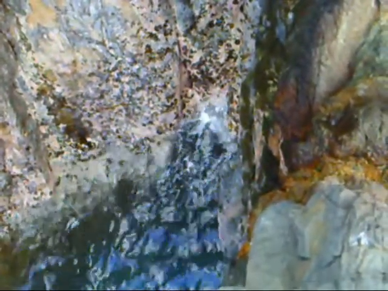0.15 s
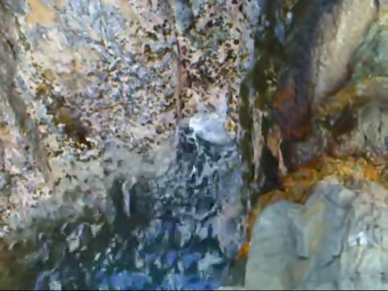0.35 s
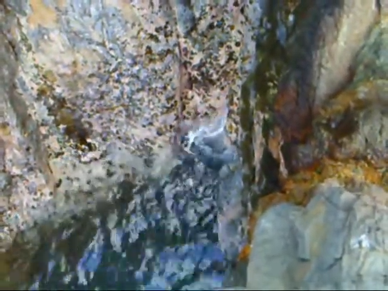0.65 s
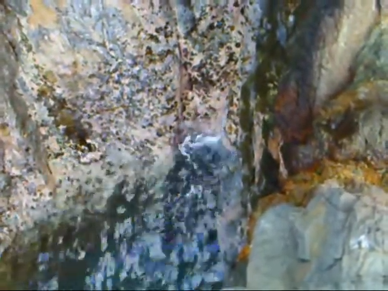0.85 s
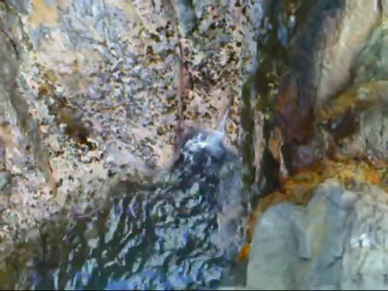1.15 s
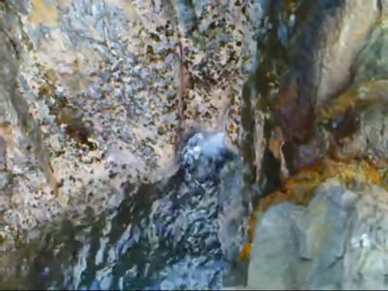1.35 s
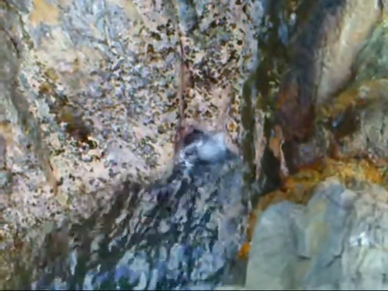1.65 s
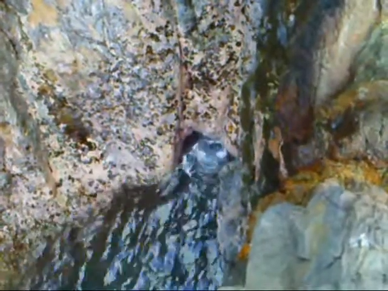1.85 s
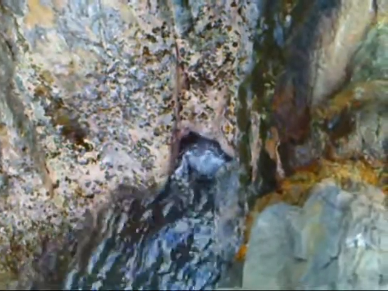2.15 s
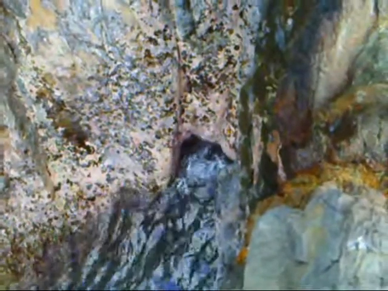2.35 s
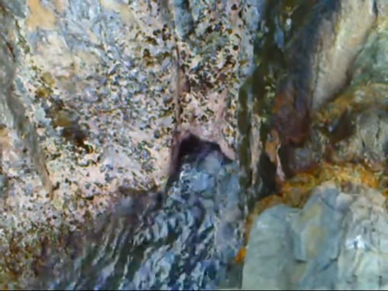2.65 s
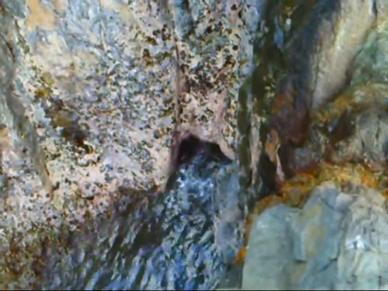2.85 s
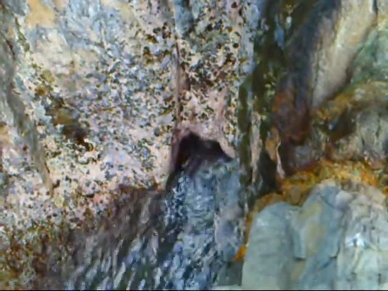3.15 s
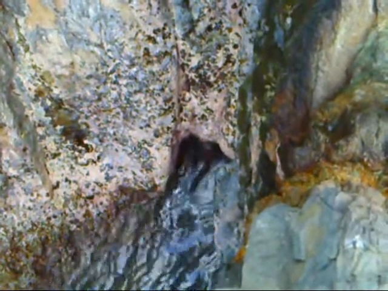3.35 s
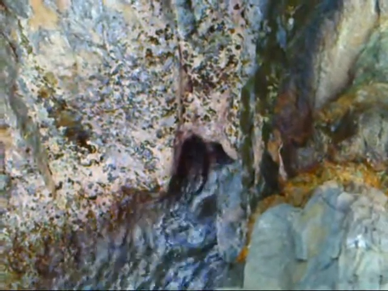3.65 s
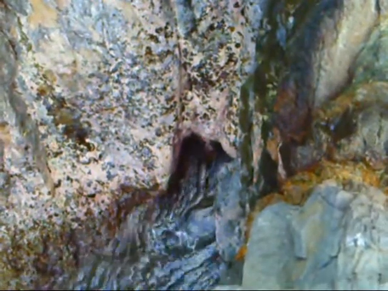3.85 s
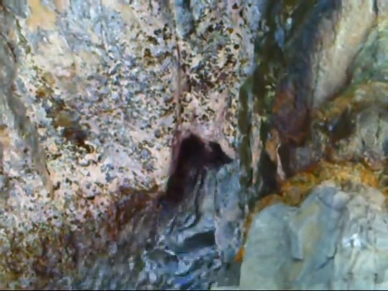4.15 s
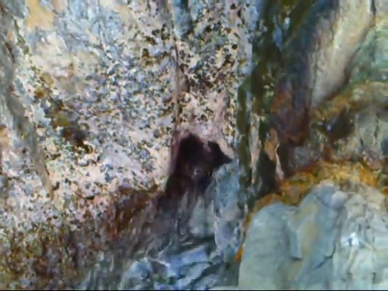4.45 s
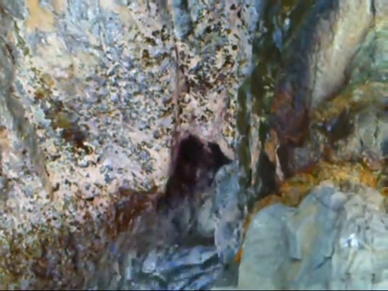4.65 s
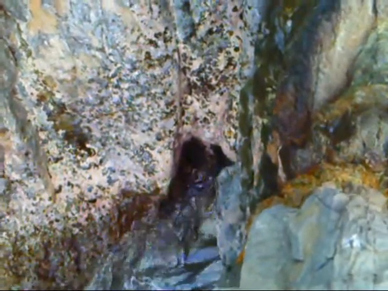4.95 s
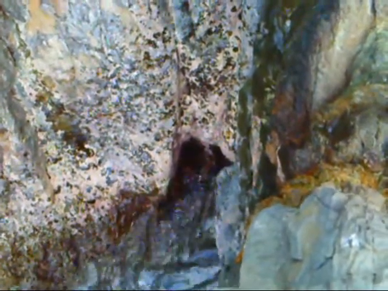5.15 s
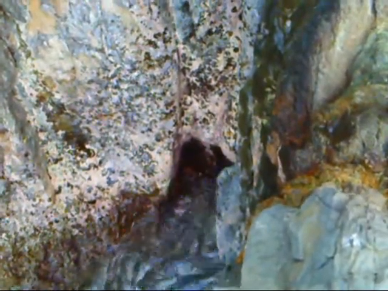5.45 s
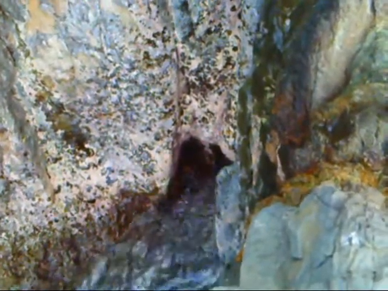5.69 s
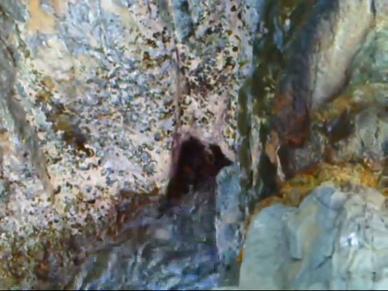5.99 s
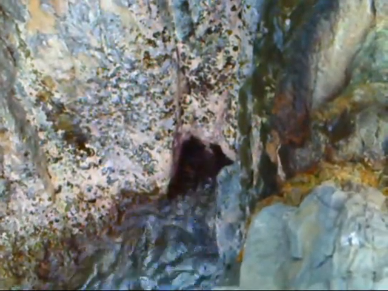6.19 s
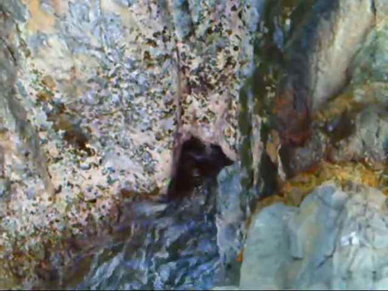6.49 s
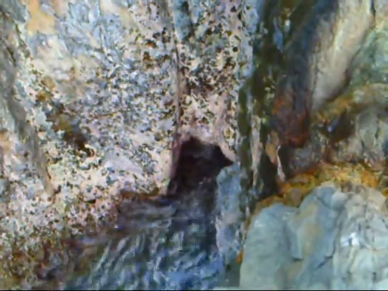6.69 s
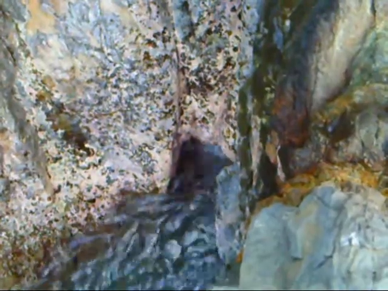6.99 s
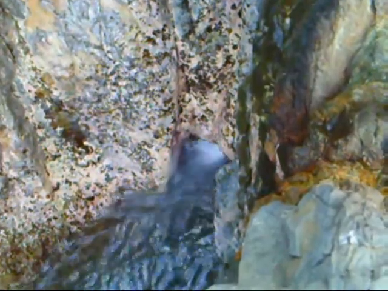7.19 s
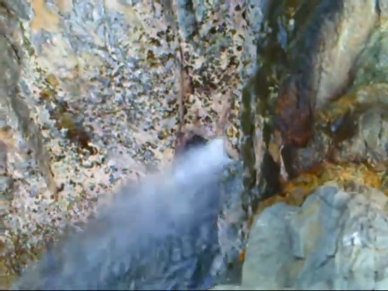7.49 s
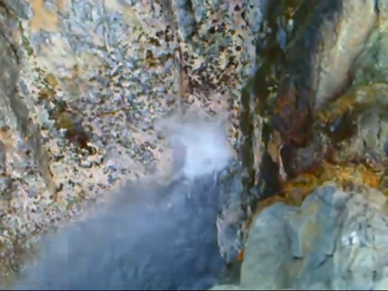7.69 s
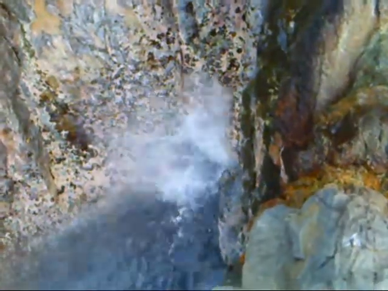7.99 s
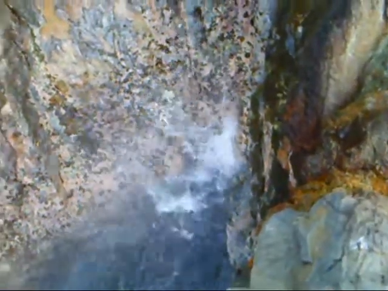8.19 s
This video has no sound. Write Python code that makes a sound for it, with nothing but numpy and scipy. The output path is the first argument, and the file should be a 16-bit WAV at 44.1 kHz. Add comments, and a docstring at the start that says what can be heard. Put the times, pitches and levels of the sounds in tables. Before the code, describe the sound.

Sea surge rushes and churns in a narrow rock inlet, waves thumping into a hollow cave before a heavier boom and a burst of hissing spray.

```python
"""Mono, one microphone on a small camera; sea surge churns in a narrow rock inlet below it, up to about 4 kHz.
From the start: noise and bubbles make the water, low noise bands the booming cave and wind on the microphone.
The waveform jumps at the joints of blocks about 1 s long. Waves slam from 1.2 s, trapped air gulps from 2.1 s
as damped, rising sines, and at 5.0 s a short stretch is nearly silent.
The heaviest slam into the cave comes at 6.8 s, and blown-out spray hangs and rains down from about 7.4 s."""
import sys
import numpy as np
from scipy import signal
from scipy.fft import rfft, irfft, next_fast_len
from scipy.io import wavfile
from scipy.ndimage import uniform_filter1d, map_coordinates

SR = 44100
rng = np.random.default_rng(int(sys.argv[2]) if len(sys.argv) > 2 else 0)


def output_pcm(signal):
    """Save a mono or channel-first signal as 16-bit PCM at the path in sys.argv[1].

    Samples are clipped to [-1, 1] before scaling.
    """
    pcm = np.clip(np.atleast_2d(signal).T, -1, 1) * 32767
    wavfile.write(sys.argv[1], SR, np.round(pcm).astype(np.int16))


def invert_db(x):
    """Field ratio 10**(x/20) for x, a level in decibels (scalar or array-like)."""
    u = np.asarray(x, float) / 20
    return 10 ** u


N = 367353

# Spectra of the low slosh, the wash and the bright spray: f/Hz, relative level/dB per Hz
SLOSH_SPECTRUM = [(130, -41.5), (200, -8), (300, -3), (430, -2.5), (560, -8.5), (800, -46)]
WASH_SPECTRUM = [(330, -41.5), (480, -6), (650, -4), (1050, -3), (1200, -4.5), (1700, -17), (2200, -37.5),
                 (3700, -120)]
SPRAY_SPECTRUM = [(1000, -23.5), (1500, -3), (1900, -2.5), (2500, -3.5), (3300, -4), (3700, -10),
                  (4000, -19), (4300, -46), (4700, -87)]
# Spectra of the cave's hollow and of wind on the microphone: f/Hz, relative level/dB per Hz
CAVE_SPECTRUM = [(50, -34.5), (85, -5.5), (130, 0), (200, 0.5), (280, -7.5), (400, -45)]
WIND_SPECTRUM = [(8, -11.5), (20, -6), (60, 2.5), (90, 0), (150, -36)]
# How hard the water runs in the inlet: t/s, wash level/dB
FLOW = [(0, -21), (.6, -23), (1.1, -23), (1.55, -20.5), (1.85, -20.5), (2.2, -19.5), (2.6, -19.5),
        (3.3, -19.5), (4.2, -20.5), (4.7, -22), (5.4, -22), (5.92, -22), (6.3, -20.5), (7.0, -19),
        (7.6, -19), (8.2, -20), (8.33, -23)]
# Waves slamming into the cave: t/s, hold/s, gush of wash/dB, hollow thump/dB, boom/dB
SLAMS = [(1.2, 0.22, 1, 2.5, 1), (2.1, 0.09, 0.4, 0.5, 1), (3.282, .1, 0.3, 2, 0.5),
         (6.023, 0.16, 0.5, 3, 3.5), (6.426, 0.18, 1.5, 0.5, 5.5), (6.791, .04, 4.5, 5.5, 11.5),
         (7.073, 0.1, 3, 3, 4.5), (7.33, 0.14, 1, 4.5, 7.5), (7.77, 0.024, 1, 1.5, 1),
         (8.025, 0.063, 1.5, 3.5, -1)]
# Spray that hangs and rains down: t/s, hold/s, added level/dB
BLOWOUT = (7.45, 0.51, 2.3)
# Cave rumble between slams: t/s, level/dB
RUMBLE = [(0, -29), (.66, -32), (1.5, -29.5), (2.2, -30.5), (3.3, -29), (3.9, -29.5), (4.6, -35),
          (5.6, -33.5), (5.9, -31), (6.3, -35), (7.6, -32), (8.33, -31)]
# Steady wind on the microphone: t/s, level/dB
BREEZE = [(0, -37), (.5, -37), (.7, -39.5), (1.35, -42.5), (3, -45), (5.7, -48.5), (6.3, -43.5), (7.3, -45),
          (8.33, -40)]
# Wind gusts: t/s, hold/s, level over the breeze/dB
GUSTS = [(.8, .24, 10), (1.75, .4, 8.5), (2.74, .12, 8), (3.302, .03, 9), (4.497, 0.5, 4),
         (6.488, .06, 11.5), (6.8, .1, 9), (7.07, .02, 8)]
# Big air pockets gulping: t/s, starting f/Hz, peak level/dB, life/cycles
GULPS = [(2.073, 91.3, -22, 7.2), (3.29, 345, -23, 12), (4.78, 245, -20, 7.5), (4.845, 496, -15, 14),
         (5.2, 612, -18.5, 20), (5.861, 109, -25, 8), (6.029, 433, -20.5, 25), (6.331, 118, -23, 11),
         (6.76, 154.4, -15, 5.1), (6.832, 140.6, -21, 9.6), (7.41, 213, -19.5, 11)]
# Block joints: t/s, jump of the waveform/full scale
JOINTS = [(.00553, .23), (1.0036, 0.076), (2.0011, .178), (2.9997, .355), (3.9979, -.206), (4.995, 0.089),
          (5.0285, -.143), (6.0262, .188), (7.0238, .0094), (8.022, .442)]
# Nearly silent stretch: start t/s, end t/s
NEAR_SILENCE = (4.995, 5.02832)

MEAN_FLOW_DB = -21
SLAM_RISE_S, SLAM_FALL_S = 0.058, 0.11
GUST_RISE_S, GUST_FALL_S = 0.092, 0.15


def unit(x):
    """x at rms 1."""
    return x / np.sqrt(np.mean(x ** 2) + 1e-20)


def curves(rows):
    """One value per sample for each column after the time."""
    s, *columns = np.transpose(rows)
    t = np.arange(N) / SR
    return [np.interp(t, s, column) for column in columns]


def wobble(rate):
    """A smooth random curve, rate knots a second."""
    knots = rng.standard_normal(N // 200)
    return map_coordinates(knots, [np.arange(N) * rate / SR])


def swell(s, hold, rise, fall):
    """0 to 1 and back, in seconds: rise up to s, hold from s, fall."""
    t = np.arange(N) / SR
    return np.interp(t, [s - rise, s, s + hold, s + hold + fall], [0, 1, 1, 0])


def coloured(x, spectrum):
    """x filtered through (Hz, dB) points on a log frequency axis, at rms 1."""
    size = next_fast_len(N + 8192)
    f, db = np.transpose(spectrum)
    log_f = np.log(np.fft.rfftfreq(size, 1 / SR) + 1)
    gain = invert_db(np.interp(log_f, np.log(f + 1), db, left=-120, right=-120))
    return unit(irfft(rfft(x, size) * gain, size)[:N])


def rush(patchy_db):
    """White noise with patches of random gain in time and frequency, patchy_db rms."""
    z = signal.stft(rng.standard_normal(N), nperseg=512)[2]
    field = uniform_filter1d(rng.standard_normal(z.shape), size=4, axis=0)
    field = uniform_filter1d(field, size=10, axis=1)
    patchy = z * invert_db(patchy_db * unit(field))
    return unit(signal.istft(patchy, nperseg=512)[1][:N])


def bubbles(s, hz, gain, cycles, size, rise=0.21):
    """Damped sines with a soft start whose pitch rises as the bubble nears the surface."""
    t = np.arange(size) / SR
    age = t * (hz / cycles)[:, None]  # in lives
    phase = 2 * np.pi * hz[:, None] * t * (1 + rise * age / 2)
    envelope = np.e * 3 * age * np.exp(-3 * age)  # peaks at 1
    wave = gain[:, None] * envelope * np.sin(phase)
    at = (s * SR).astype(int)[:, None] + np.arange(size)
    return np.bincount(at.ravel(), wave.ravel(), N + size)[:N]


def froth(hz, cycles, count, size):
    """A dense swarm of bubbles of log-normal pitch and uneven level, at rms 1."""
    s = rng.random(count) * N / SR
    pitch = hz * np.exp(0.422 * rng.standard_normal(count))
    gain = invert_db(2.8 * rng.standard_normal(count))
    return unit(bubbles(s, pitch, gain, np.full(count, cycles), size))


def surge():
    """Flow about its mean, and the gush, thump and boom of the slamming waves, in dB."""
    flow_db, = curves(FLOW)
    shapes = np.array([swell(s, hold, SLAM_RISE_S, SLAM_FALL_S) for s, hold, *_ in SLAMS])
    gush_db, thump_db, boom_db = np.transpose(SLAMS)[2:] @ shapes
    return flow_db - MEAN_FLOW_DB, gush_db, thump_db, boom_db


def slosh(heave):
    """Low water: rushing noise and big bubbles, stronger with the flow and with each hollow thump."""
    flow_db, _, thump_db, _ = surge()
    level_db = MEAN_FLOW_DB - 4.5 + 1.1 * flow_db + thump_db
    source = rush(patchy_db=-0.5) + 0.091 * froth(350, 6.9, count=2500, size=1200)
    return invert_db(level_db + 0.45 * heave) * coloured(source, SLOSH_SPECTRUM)


def wash(heave):
    """Midrange water: rushing noise and bursting bubbles that follow the flow and gush with each slam."""
    flow_db, gush_db, _, _ = surge()
    level_db = MEAN_FLOW_DB + flow_db + gush_db
    source = rush(patchy_db=.5) + 0.094 * froth(850, 4.93, count=6000, size=600)
    return invert_db(level_db + heave) * coloured(source, WASH_SPECTRUM)


def spray(heave):
    """Bright water: noise and tiny bubbles that gush with the slams; the blowout falls away slowly."""
    flow_db, gush_db, _, _ = surge()
    s, hold, db = BLOWOUT
    blowout_db = db * swell(s, hold, rise=0.061, fall=0.7)
    level_db = MEAN_FLOW_DB - 11 + .9 * flow_db + 1.12 * gush_db + blowout_db
    source = rush(patchy_db=-0.73) + 0.18 * froth(2600, 3.6, count=25000, size=160)
    return invert_db(level_db + 0.2 * heave) * coloured(source, SPRAY_SPECTRUM)


def water():
    """Slosh, wash and spray share the quick heave of the surge, each to its own degree."""
    heave = .55 * wobble(6.4) + 0.14 * wobble(40)  # dB
    return slosh(heave) + wash(heave) + spray(heave)


def gusts():
    """Rise of the wind over the breeze, in dB."""
    return sum(db * swell(s, hold, GUST_RISE_S, GUST_FALL_S) for s, hold, db in GUSTS)


def cave_boom():
    """The hollow rumbles under the swell as a low noise band, booms with slams and lifts a little in gusts."""
    *_, slam_db = surge()
    level_db = curves(RUMBLE)[0] + slam_db + .2 * gusts()
    return invert_db(level_db + 0.5 * wobble(6.5)) * coloured(rush(patchy_db=.5), CAVE_SPECTRUM)


def wind():
    """Breeze and gusts thud on the microphone as very low noise of uneven level."""
    level_db = curves(BREEZE)[0] + gusts()
    return invert_db(level_db + 1.1 * wobble(2.8)) * coloured(rng.standard_normal(N), WIND_SPECTRUM)


def air_gulps():
    """Air pockets gulp at the cave mouth: damped sines of slightly rising pitch."""
    s, hz, db, cycles = np.transpose(GULPS)
    return bubbles(s, hz, invert_db(db), cycles, size=12000, rise=.03)


def scene():
    """Water, cave, wind and air gulps at one microphone."""
    return (water() + cave_boom() + wind() + air_gulps())[None]


def low_pass(x):
    """Removes everything above the highest recorded frequency."""
    return signal.sosfilt(signal.butter(12, 12920, fs=SR, output="sos"), x)


def record(dry):
    """A small offset, a jump at each block joint that settles within milliseconds, one nearly silent stretch."""
    t = np.arange(N) / SR
    # each jump decays on both sides of its joint, time constant 0.53 ms
    jumps = sum(size * np.sign(t - s) / 2 * np.exp(-np.abs(t - s) / 0.00053) for s, size in JOINTS)
    start, end = NEAR_SILENCE
    written = np.where((t < start) | (t >= end), 1, invert_db(-32))
    offset = -.006  # full scale 1
    mix = (dry + offset + jumps) * written
    return low_pass(mix)


dry = scene()
out = record(dry)
output_pcm(out)
```